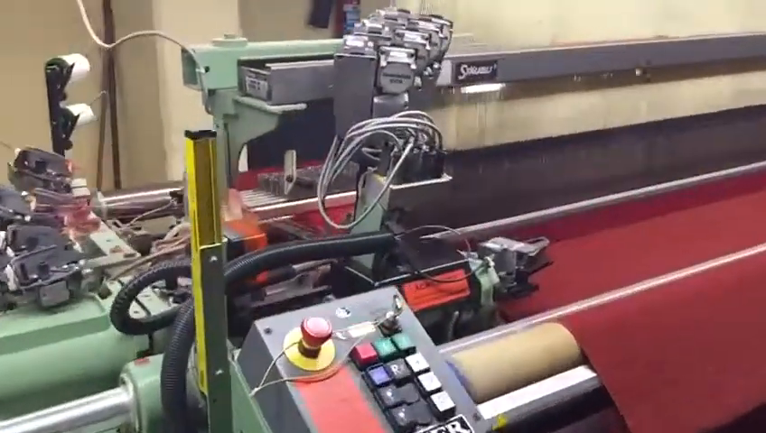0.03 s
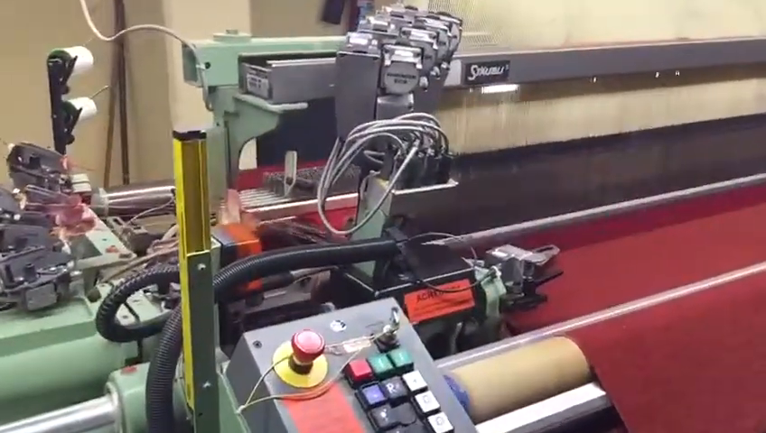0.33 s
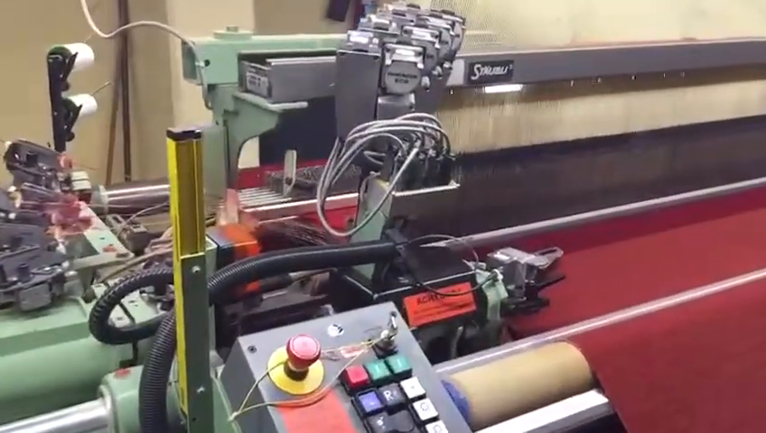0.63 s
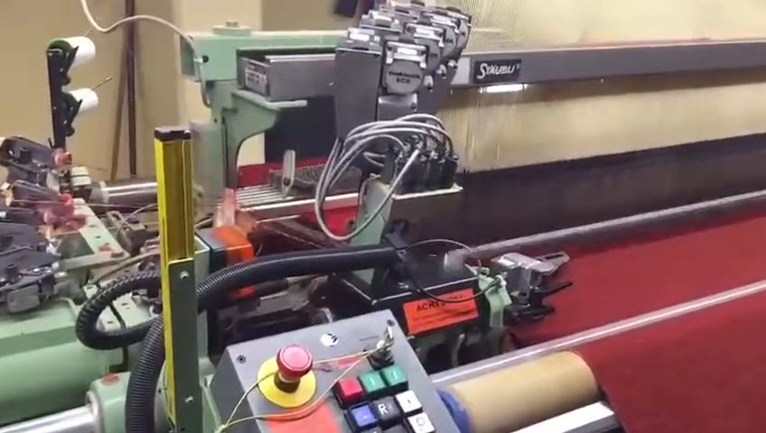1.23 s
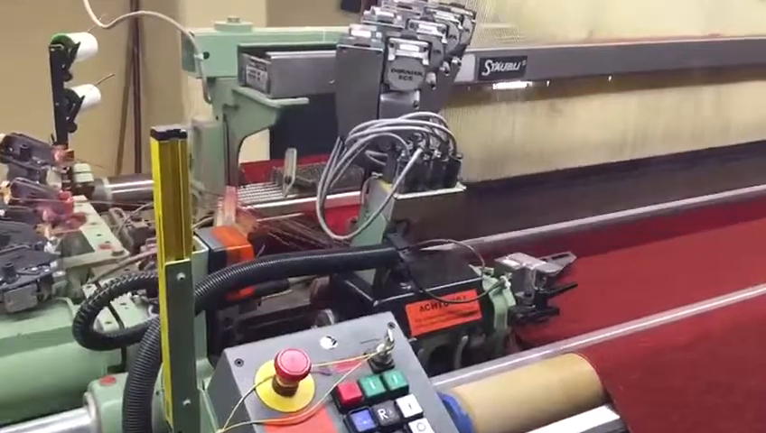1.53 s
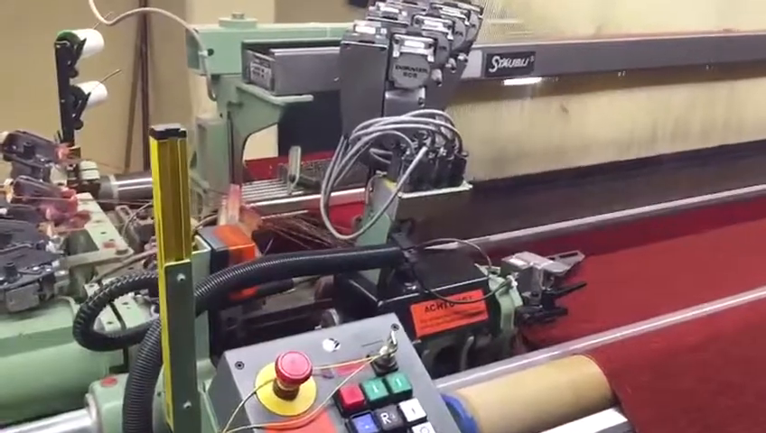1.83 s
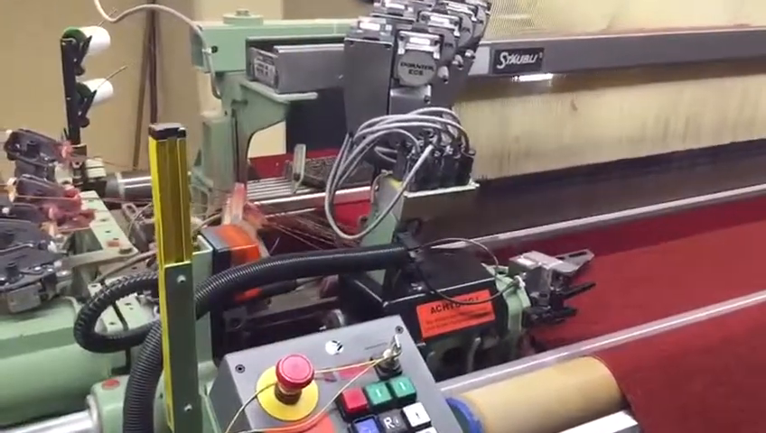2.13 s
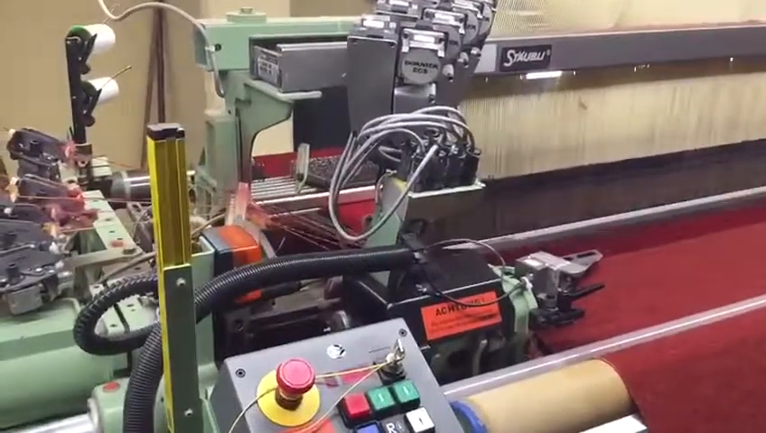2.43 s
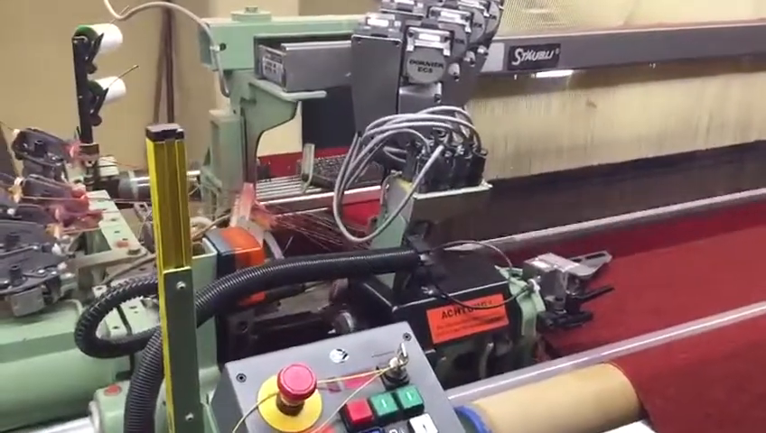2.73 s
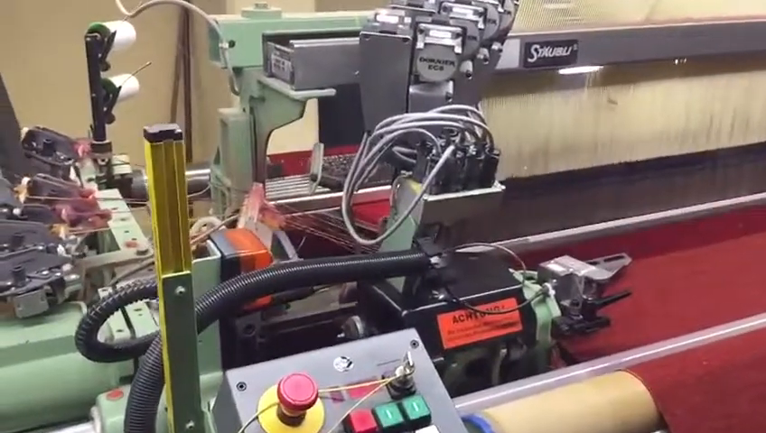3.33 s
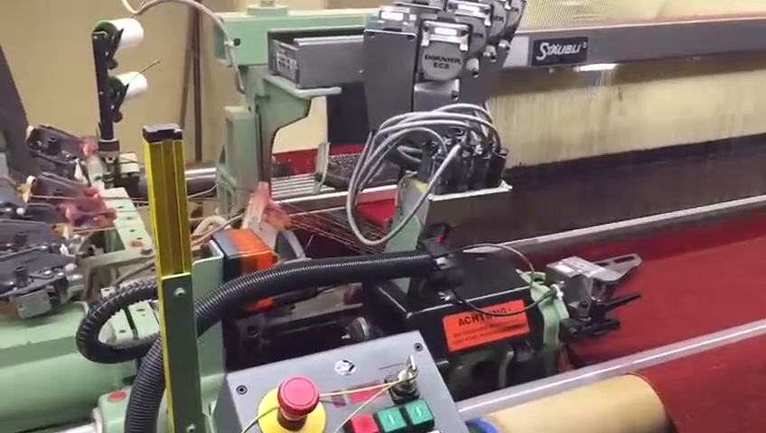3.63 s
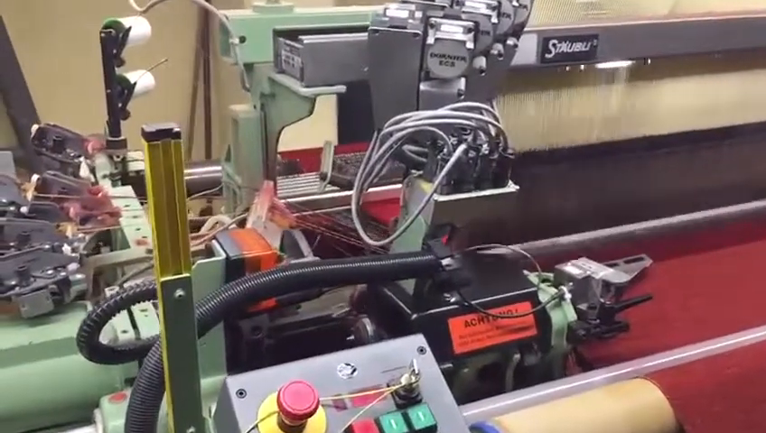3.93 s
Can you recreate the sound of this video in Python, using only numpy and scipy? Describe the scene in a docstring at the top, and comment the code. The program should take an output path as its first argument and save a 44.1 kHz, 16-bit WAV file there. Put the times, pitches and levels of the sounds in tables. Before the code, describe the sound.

Muffled weaving loom rumbling steadily, with a clacking beat a little over once a second.

```python
"""Wide loom in a workshop

From beside the control panel: a loom runs slowly, one pick about every 1.25 s, over the deep rumble
of its drive, with soft low thuds in it. In each pick the shafts whirr, the yarn swishes, a latch snaps
and the reed beats up and rebounds. The frame groans now and then; steel heddles rattle at the start.
The treble closes in steps during the first half second and stays muffled; one dry tick cuts through."""
import sys
import numpy as np
from scipy import signal
from scipy.fft import rfft, irfft
from scipy.io import wavfile
from scipy.ndimage import uniform_filter1d, map_coordinates

SR = 44100
rng = np.random.default_rng(int(sys.argv[2]) if len(sys.argv) > 2 else 0)


def log_audio(samples):
    """Write samples as a 16-bit WAV file to the path given in sys.argv[1]."""
    # one column per channel
    frames = np.atleast_2d(samples).T
    # limit to full scale, then quantise
    limited = np.clip(frames, -1, 1)
    pcm = np.round(limited * 32767).astype(np.int16)
    wavfile.write(sys.argv[1], SR, pcm)


N = 176400
T = np.arange(N) / SR


def amp(db):
    """Decibels to gain."""
    return 10 ** (np.asarray(db) / 20)


def unit(x):
    """Scales to rms 1."""
    return x / np.sqrt(np.mean(x ** 2) + 1e-20)


def add(mix, s, sound):
    """Mixes a sound in at s seconds."""
    part = mix[max(round(s * SR), 0):][:len(sound)]
    part += sound[:len(part)]


def wander(count, step):
    """A smooth random curve that turns about every step points."""
    knots = rng.standard_normal(count)
    return unit(map_coordinates(knots, [np.arange(count) / max(step, 1)], order=1))


def band_noise(hz, width_hz):
    """Noise in one bell-shaped band."""
    f = np.fft.rfftfreq(N, 1 / SR)
    bell = np.exp(-2 * ((f - hz) / width_hz) ** 2)
    return unit(irfft(rfft(rng.standard_normal(N)) * bell, N))


def workshop(x, t60_s=.45, tail_db=-11):
    """The room answers with a short diffuse tail, 10 ms behind the direct sound."""
    t = np.arange(SR // 2) / SR
    tail = rng.standard_normal(len(t)) * amp(-60 * t / t60_s) * (t > .01)
    return x + amp(tail_db) * signal.fftconvolve(x, tail / np.linalg.norm(tail))[:N]


def running(spectrum, level, ripple_db=1.3, ripple_step_hz=18, ripple_above_hz=600, steady_s=.12):
    """Noise of moving parts, coloured by the frame's many narrow resonances, on a level curve."""
    # strongest resonances of the frame: f/Hz, width/Hz, boost/dB
    frame_peaks = [(487.6, 14, 2), (560, 22, 2.5), (789, 14, 4.5), (1082, 24, 1.5), (1440, 20, 2),
                   (1800, 16, 0.5), (1990, 9.4, 3)]
    f = np.fft.rfftfreq(N, 1 / SR)
    hz, db = np.transpose(spectrum)
    colour = np.interp(np.log(f + 1), np.log(hz), db, right=-120)
    ripple = ripple_db * wander(len(f), ripple_step_hz * N / SR) * f / (f + ripple_above_hz)
    for centre, width, peak_db in frame_peaks:
        ripple += peak_db / (1 + (2 * (f - centre) / width) ** 2)
    phases = np.exp(2j * np.pi * rng.random(len(f)))
    noise = unit(irfft(phases * amp(colour + ripple), N))
    # the parts keep their strength: even out the noise's own slow swells
    power = uniform_filter1d(noise ** 2, round(steady_s * SR))
    power = uniform_filter1d(power, round(steady_s * SR / 2))
    return unit(noise / np.sqrt(power)) * amp(np.interp(T, *np.transpose(level)))


def drive():
    """The floor rumbles, the drive drones and its gearing churns throughout."""
    # spectra of floor, drive and gearing: f/Hz, relative density/dB
    rumble_spectrum = [(6, -10.5), (14, 0.5), (22, -1.5), (33, 3.5), (48, -5), (62, -17.5), (120, -56.5)]
    drone_spectrum = [(35, -27.5), (52, -4.5), (68, -1), (88, 0), (104, -6.5), (130, -29), (220, -55.5)]
    gear_spectrum = [(70, -26), (104, -4.5), (135, -3), (185, -4), (212, 0), (245, -6.5), (330, -10),
                     (420, -15), (600, -23), (1200, -47)]
    # their rise and fall: t/s, relative level/dB
    rumble_level = [(0, -50), (.12, -34), (.29, -46.5), (.36, -32), (.56, -29.5), (.9, -32), (1.22, -34.5),
                    (1.32, -25.5), (1.46, -29), (1.63, -39), (1.78, -32), (2.06, -29), (2.15, -34.5),
                    (2.45, -26.5), (2.75, -29.5), (3.35, -29), (3.5, -31.5), (3.8, -33), (4, -37.5)]
    drone_level = [(0.0, -48.5), (0.11, -30.5), (0.26, -42), (0.28, -34), (0.79, -36), (0.87, -38.5),
                   (0.89, -34.5), (1.08, -40.5), (1.15, -32), (1.19, -47), (1.26, -35), (2.45, -33),
                   (2.52, -40), (2.72, -32), (2.97, -36.5), (3.02, -30.5), (3.16, -38), (3.19, -34.5),
                   (3.22, -36.5), (3.58, -37.5), (3.72, -31), (4.0, -38.5)]
    gear_level = [(0, -38.5), (.12, -35), (.3, -35.5), (.54, -31.5), (.78, -30), (0.861, -32), (.92, -30.5),
                  (.97, -33.5), (1.16, -31), (1.32, -33.5), (1.5, -31.5), (1.76, -32), (2.04, -31.5),
                  (2.22, -31.5), (2.31, -30.5), (2.38, -34), (2.55, -32), (2.69, -31.5), (2.75, -33.5),
                  (2.84, -32), (2.98, -33), (3.079, -30), (3.3, -31), (3.55, -33.5), (3.75, -32),
                  (3.85, -34.5), (3.95, -33), (4, -30.5)]
    rumble = amp(1.5) * running(rumble_spectrum, rumble_level)
    return rumble + running(drone_spectrum, drone_level) + running(gear_spectrum, gear_level)


def shafts_and_yarn(flutter_db=1, flutter_s=.012):
    """Shafts whirr and yarn swishes, swelling with the picks and fluttering together."""
    # spectra of shafts and yarn: f/Hz, relative density/dB
    whirr_spectrum = [(200, -20.5), (400, -1), (490, 0), (610, -2), (690, 1.5), (790, 0), (890, 1.5),
                      (965, -3), (1110, -3), (1230, -5), (1310, -8), (1900, -25)]
    swish_spectrum = [(600, -21), (1200, -3), (1480, 3), (1700, 2), (2000, -0.7), (2250, -2), (3100, -3.5),
                      (4000, -9.5), (6500, -13), (9000, -15), (11000, -22)]
    # their swells: t/s, relative level/dB
    whirr_level = [(0, -35.5), (.12, -38.5), (.24, -40.5), (.31, -42), (0.481, -46), (.66, -40),
                   (.97, -42.5), (1.151, -41), (1.65, -44), (1.839, -44.5), (1.92, -40.5), (2.15, -42),
                   (2.55, -40), (2.898, -43), (3.161, -44.5), (3.29, -39), (3.7, -40.5), (4, -39.5)]
    swish_level = [(0, -40), (.12, -41.5), (.28, -43.5), (.4, -42.5), (.46, -50.5), (0.581, -46),
                   (.7, -45.5), (0.949, -49.5), (1.199, -46), (1.701, -47.5), (1.85, -48), (2, -44.5),
                   (2.169, -46.5), (2.451, -42), (2.799, -49.5), (3.05, -49.5), (3.2, -46.5), (3.302, -40),
                   (3.7, -40.5), (3.88, -37), (4, -43.5)]
    flutter = amp(flutter_db * wander(N, flutter_s * SR))
    whirr = running(whirr_spectrum, whirr_level)
    swish = amp(-1) * running(swish_spectrum, swish_level)
    return flutter * (whirr + swish)


def groans():
    """A resonance of the frame swells and fades as sliding parts rub."""
    # rubs: middle t/s, length/s, f/Hz, width/Hz, level/dB
    rubs = [(.04, 0.22, 1090, 480, -38), (.05, .16, 2500, 400, -47), (0.139, 0.7, 540, 380, -40),
            (0.377, 0.13, 310, 300, -36), (0.395, .11, 680, 520, -37.5), (.77, 0.17, 763, 130, -43.5),
            (.76, .2, 215, 70, -34), (2.6, 0.26, 888, 89.4, -44.5), (3.303, 0.18, 565, 30, -39.5)]
    out = np.zeros(N)
    for s, length, hz, width, db in rubs:
        swell = np.cos(np.pi * np.clip((T - s) / length, -.5, .5))
        out += amp(db) * swell * band_noise(hz, width)
    return out


def heddles(rise_s=.0014, t60_s=.081):
    """Thin steel heddles rattle in quick bright bursts."""
    # rattles: t/s, level/dB
    rattles = [(.008, -49.5), (.045, -52.5), (.078, -46), (0.107, -50), (0.165, -41.5), (0.186, -40),
               (0.209, -39), (.232, -47)]
    level = np.zeros(N)
    for s, db in rattles:
        age = np.maximum(T - s, 0)
        level += np.minimum(age / rise_s, 1) * amp(db - 60 * age / t60_s)
    return level * band_noise(hz=5140, width_hz=3310)


def blow(modes, chatter_s, contacts_per_s=1300, fade_db=-5, crack_db=-8):
    """Loose steel parts meet in a quick chatter of contacts that cracks and rings their modes."""
    t = np.arange(SR // 4) / SR
    signs = np.sign(rng.standard_normal(len(t)))
    contacts = signs * (rng.random(len(t)) < contacts_per_s / SR) * (t < chatter_s)
    contacts[0] = amp(3.5)  # the first contact is the hardest
    contacts *= amp(fade_db * np.minimum(t / chatter_s, 1))
    ring = 0
    for hz, db, t60 in modes:
        mode = amp(-60 * t / t60) * np.sin(2 * np.pi * hz * t)
        ring = ring + amp(db) * unit(signal.fftconvolve(contacts, mode)[:len(t)])
    crack = signal.sosfilt(signal.butter(2, [392, 2400], "band", fs=SR, output="sos"), contacts)
    sound = unit(ring) + amp(crack_db) * unit(crack)
    return sound / np.sqrt(np.mean(sound[:SR // 40] ** 2))  # rms 1 over the first 25 ms


def beating(latch_lead_s=.0625, rebound_s=.0595):
    """In each pick the latch snaps, the reed beats up and rebounds; the linkage knocks between."""
    # picks: beat-up t/s, latch level/dB, beat-up level/dB, rebound level/dB
    picks = [(1.0775, -36.5, -31, -37), (2.3135, -35.5, -33.5, -38), (3.5715, -35.5, -34.5, -42.5)]
    # light knocks of the linkage: t/s, level/dB
    knocks = [(.402, -41), (.631, -46.5), (.766, -44.5), (0.859, -50), (1.277, -48), (1.549, -46),
              (1.914, -43.5), (2.603, -48.5), (2.717, -49.5), (2.797, -42.5), (3.244, -41), (3.375, -38.5),
              (3.406, -43.5), (3.45, -42.5), (3.943, -42)]
    # ring of the struck parts: f/Hz, relative level/dB, t60/s
    latch_modes = [(535, 3.5, 0.05), (800, -3, 0.04), (1100, -5.5, .05), (1456, -6.5, 0.056),
                   (2000, -10.5, 0.062), (2160, -4, 0.02)]
    reed_modes = [(494, 7.5, 0.046), (750, 0, 0.038), (1200, -9.5, .05), (1500, 0, .069), (1792, -5, 0.16),
                  (1880, -4.5, .06), (1984, -1, 0.11)]
    out = np.zeros(N)
    for s, latch_db, beat_db, rebound_db in picks:
        add(out, s - latch_lead_s, amp(latch_db) * blow(latch_modes, chatter_s=.01))
        add(out, s, amp(beat_db) * blow(reed_modes, chatter_s=.022))
        add(out, s + rebound_s, amp(rebound_db) * blow(reed_modes, chatter_s=.022))
    for s, db in knocks:
        add(out, s, amp(db) * blow(reed_modes, chatter_s=.018))
    return workshop(out)


def thuds(rise_s=.0066):
    """Soft low thuds in the rumble, each a few cycles long."""
    # thuds: t/s, f/Hz, peak level/dB
    low_thuds = [(.511, 184, -23.5), (.546, 92, -20), (.644, 73.6, -25), (.706, 199.3, -27),
                 (.757, 88, -25), (.889, 165.3, -25), (1.172, 124, -26), (1.288, 45, -20),
                 (1.629, 139.5, -26), (1.831, 161, -25.5), (2.104, 331, -30), (2.123, 135.5, -22),
                 (2.304, 142, -26), (2.487, 370, -28), (3.003, 130, -25.5), (3.016, 311, -31),
                 (3.185, 84.5, -22.5), (3.23, 130, -23), (3.404, 134.2, -27), (3.94, 199, -24.5)]
    out, t = np.zeros(N), np.arange(SR // 5) / SR
    envelope = t / rise_s * np.exp(1 - t / rise_s)
    for s, hz, db in low_thuds:
        add(out, s, amp(db) * envelope * np.sin(2 * np.pi * (hz * t + rng.random())))
    return workshop(out)


def tick(decay_s=.00034):
    """One dry tick: a sharp edge that dies at once, with no room on it."""
    return .076 * np.exp(-T[:SR // 100] / decay_s)


def scene():
    """The whole loom in mono, heard from beside its control panel."""
    return (drive() + thuds() + shafts_and_yarn() + beating() + groans() + heddles())[None]


def record(dry, crossfade_s=.003, tick_at_s=1.4233, band_limit_hz=16000):
    """The treble closes in steps; the tick escapes them and meets only the final band limit."""
    # upper edge of the treble: from t/s, f/Hz
    treble_steps = [(0, 10800), (.04, 10350), (.125, 7600), (.252, 5000), (.436, 2232)]
    out = np.zeros(N)
    for s, hz in treble_steps:
        lowpass = signal.firwin(4095, hz, window=("kaiser", 8), fs=SR)
        dull = signal.oaconvolve(dry[0], lowpass, "same")
        blend = .5 + .5 * np.tanh((T - s) / crossfade_s) if s else 1
        out += blend * (dull - out)
    add(out, tick_at_s, tick())
    band_limit = signal.firwin(511, band_limit_hz, window=("kaiser", 9), fs=SR)
    return signal.oaconvolve(out, band_limit, "same")[None]


dry = scene()
out = record(dry)
log_audio(out)
```